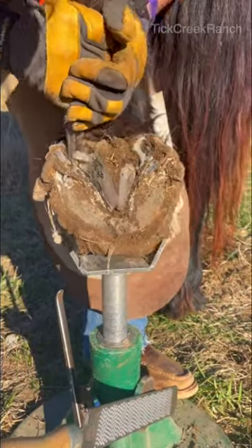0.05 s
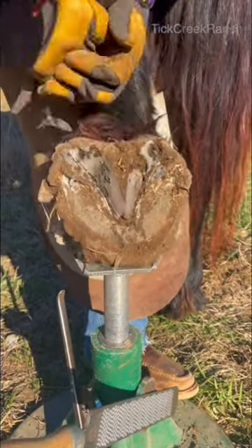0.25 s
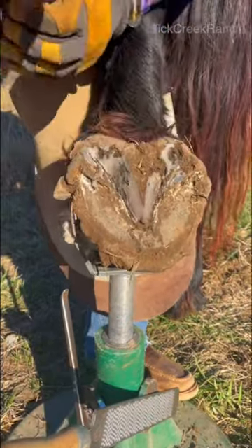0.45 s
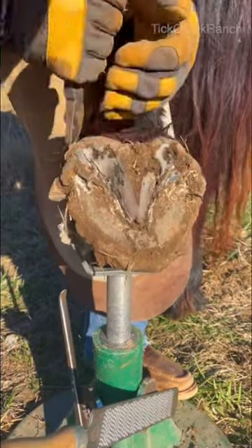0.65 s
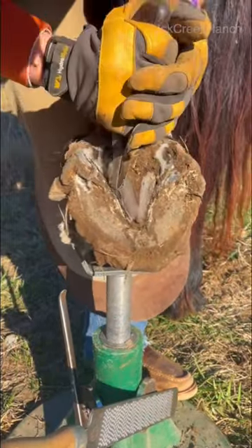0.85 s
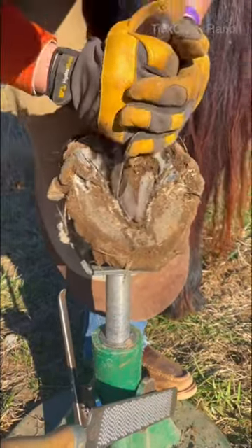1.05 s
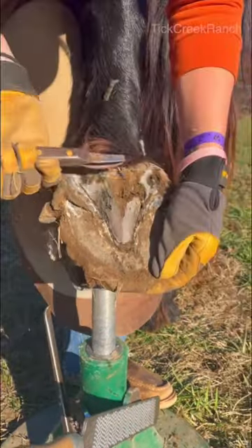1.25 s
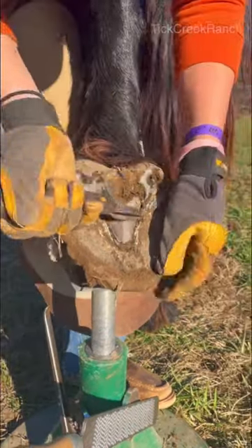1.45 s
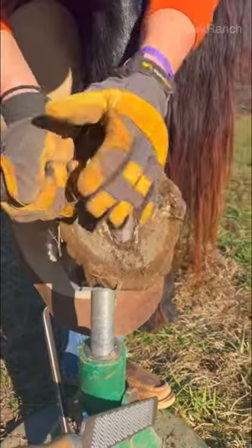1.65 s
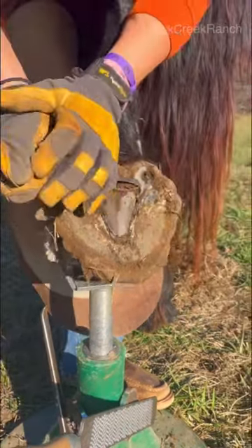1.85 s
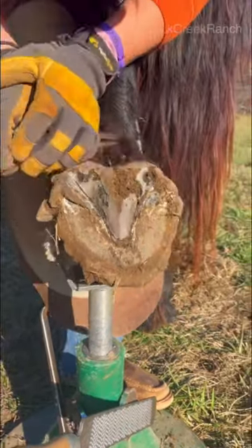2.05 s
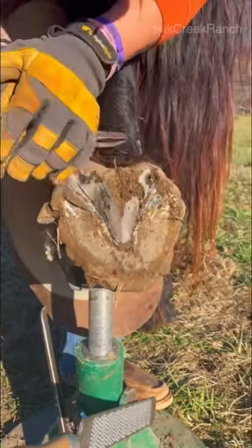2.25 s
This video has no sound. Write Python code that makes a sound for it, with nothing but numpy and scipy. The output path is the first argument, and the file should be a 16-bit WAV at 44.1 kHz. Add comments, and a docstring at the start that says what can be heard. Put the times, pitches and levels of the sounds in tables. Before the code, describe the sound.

Close, dry scraping and clicking of a blade paring a horse hoof outdoors.

```python
"""A dry rasp and a knock over low wind: a hoof knife paring a horse's hoof on a metal stand,
outdoors, close to a two-port microphone. Blade and gloves rub on horn, grit ticks, steel squeaks
and pings faintly. Knocks travel through the stand as falling chirps, and light wind rumbles on the
ports. In front, hard cuts of the stick-slipping edge and sharp snaps and taps ring hoof and blade."""
import sys
import numpy as np
from scipy import signal
from scipy.fft import rfft, irfft, next_fast_len
from scipy.io import wavfile

SR = 44100
rng = np.random.default_rng(int(sys.argv[2]) if len(sys.argv) > 2 else 0)


def transcribe(u):
    """Save the signal u as a 16-bit wav file named by the first command-line argument.

    u: samples, shape (n,) or (channels, n), limited to [-1, 1]; the rate is SR.
    q: integer samples, one column per channel.
    """
    v = np.clip(np.atleast_2d(u).T, -1, 1)
    q = np.round(v * 32767).astype(np.int16)
    wavfile.write(sys.argv[1], SR, q)


N = 101429


def from_db(db):
    """Decibels to gain."""
    return 10 ** (np.asarray(db) / 20)


def unit_rms(x):
    """Scale to an rms of 1."""
    return x / np.sqrt(np.mean(x ** 2) + 1e-20)


def in_time(rows):
    """Columns of a curve table at every sample."""
    times, *columns = np.transpose(rows)
    return [np.interp(np.arange(N) / SR, times, column) for column in columns]


def at_hz(rows, hz):
    """A spectrum table read on a log-frequency axis."""
    row_hz, values = np.transpose(rows)
    return np.interp(np.log(hz + 1e-9), np.log(row_hz), values)


def shaped(x, gain):
    """Filter by a gain given as a function of frequency."""
    size = next_fast_len(N + 4096)
    hz = np.arange(size // 2 + 1) * SR / size
    return irfft(rfft(x, size) * gain(hz), size)[..., :N]


def drift(rate_hz):
    """Smooth random wander; rms 1."""
    r = np.exp(-2 * np.pi * rate_hz / SR)
    return unit_rms(signal.lfilter([1], [1, -2 * r, r * r], rng.standard_normal(N + SR))[SR:])


def grains(per_s, spread_db):
    """Random clicks of uneven size and sign; rms 1."""
    sizes = from_db(spread_db * np.minimum(rng.exponential(1, N), 4))
    signs = rng.choice([-1, 1], N)
    return unit_rms(sizes * signs * (rng.random(N) < per_s / SR))


def ring(clicks, hz, t60):
    """A unit click sets a sine of height 1 ringing."""
    r, w = from_db(-60 / (t60 * SR)), 2 * np.pi * hz / SR
    return signal.lfilter([0, np.sin(w)], [1, -2 * r * np.cos(w), r * r], clicks + 1e-18)


def add(out, start_s, sound):
    """Mix a short sound in at a time."""
    i = int(start_s * SR)
    out[i:i + len(sound)] += sound[:N - i]


# Light wind, right on the microphone. Each row: time in seconds, level in dB.
WIND_LEVEL = [(0, -65), (.03, -52.5), (.1, -63), (.19, -55), (.22, -59.5), (.3, -45), (.37, -65.5),
              (.44, -57), (.56, -63), (.62, -56), (.8, -64.5), (.97, -61.5), (1.0, -53.5), (1.04, -63.5),
              (1.45, -64.5), (1.56, -69.5), (1.82, -64), (2.09, -63), (2.18, -66), (2.3, -65)]
# Its colour. Each row: frequency in Hz, relative level in dB.
WIND_SPECTRUM = [(22, -23), (45, -0.5), (70, 1), (120, -3.5), (200, -13.5), (350, -22), (600, -31.5)]

def wind(correlation=0.89):
    """Wind rumbles on the two ports, mostly alike in both."""
    level_db, = in_time(WIND_LEVEL)
    colour = lambda hz: from_db(at_hz(WIND_SPECTRUM, hz)) * (hz > 15) / (1 + (hz / 600) ** 4)
    mid, side = shaped(rng.standard_normal((2, N)), colour)
    pair = np.sqrt(1 + correlation) * mid + np.sqrt(1 - correlation) * side * [[1], [-1]]
    return from_db(level_db) * unit_rms(pair)


# At the microphone. Each row: frequency in Hz, lead of the left port over the right in radians.
LEFT_PORT_LEAD = [(20, 0), (2200, 0.5643), (4000, 1.5), (6000, 0.5), (7050, 4), (8350, 1), (9500, 7),
                  (12000, 7.5), (13500, 8.5), (15200, 10), (17000, 11.5)]
# Scatter off grass and hands. Each row: frequency in Hz, level in dB relative to the direct sound.
SCATTER_SPECTRUM = [(100, -30), (600, 0.5), (1500, -9.5), (3500, -15.5), (6800, -36.5), (15000, -28.5)]

def ports(work, rubbing):
    """Each port hears it all with its own phase, plus its own scatter of the rubbing."""
    pair = []
    for side in (1, -1):
        direct = shaped(work + rubbing, lambda hz: np.exp(.5j * side * at_hz(LEFT_PORT_LEAD, hz)))
        scatter = shaped(rubbing * drift(410), lambda hz: from_db(at_hz(SCATTER_SPECTRUM, hz)))
        pair.append(direct + scatter)
    return np.array(pair)


def wavering_tones(rows, hz, length_s):
    """Short tones that swell and fade, unsteady in pitch and level."""
    swells, t = np.zeros(N), np.arange(int(length_s * SR)) / SR
    pitch_hz = hz + 48.25 * drift(240)
    tone = np.sin(2 * np.pi * np.cumsum(pitch_hz) / SR)
    for start, db in rows:
        add(swells, start, from_db(db) * np.sin(np.pi * t / length_s))
    return swells * tone * from_db(2.5 * drift(200))


# The blade, faint even this close. Each row: start in seconds, level in dB.
BLADE_SQUEAKS = [(1.538, -72), (1.556, -69.5), (1.616, -73), (1.674, -64.5)]
STEEL_PINGS = [(.317, -53.5), (.553, -62)]
BLADE_RELEASE = [(2.042, -52.5)]

def blade():
    """The steel squeaks as it slides, pings, and sings as it comes free."""
    squeaks = wavering_tones(BLADE_SQUEAKS, hz=1930, length_s=0.016)
    pings = wavering_tones(STEEL_PINGS, hz=10600, length_s=0.013)
    release = wavering_tones(BLADE_RELEASE, hz=5000, length_s=0.034)
    return squeaks + pings + release


# Rubbing on the horn, close up. Each row: time in seconds, level of the middle band in dB,
# then lows and treble in dB relative to it.
RASP_LEVELS = [(0, -56.5, 3, -0.5), (.025, -56, -4, -2), (.05, -62, -10, -7), (.13, -71.5, -24, -5),
               (.165, -53, -3, -4), (.21, -59.5, -10.5, -8), (.22, -45.5, -8, -2), (.243, -41.5, -2.5, 0),
               (.258, -57, -21, -7.5), (.28, -54, 3.5, -5), (.32, -63.5, -10, 0.5), (.36, -71.5, -8, -3.5),
               (.5, -76, 5, -4.5), (.75, -78.5, 5.5, -3.5), (.762, -62.5, -11, 5.5), (.785, -63.5, -2, -11),
               (.82, -70, 4, -6), (.98, -79, 7, -2), (1.1, -73, -19.5, -4), (1.17, -64, 0, -1),
               (1.24, -71, 2.5, -7.5), (1.255, -61, -13, -9), (1.32, -64, -12, -7.5), (1.39, -81, 4, -0.5),
               (1.46, -72.5, -7, -4), (1.5, -83, -5, -2), (1.66, -73, -6, -5), (1.72, -64, -9, -9),
               (1.76, -66, -7.5, -7), (1.87, -69, -8.5, -8), (1.96, -59, -2, -4.5), (2.0, -63, 0, 0),
               (2.02, -57, -10, 2.5), (2.052, -48, -7, -7.5), (2.07, -56, -3, -9), (2.13, -61.5, -8, -4.5),
               (2.19, -72.5, -19, -8), (2.24, -62, -8.5, -8), (2.3, -60, -4, -9)]
# Colour within the bands. Each row: frequency in Hz, relative level in dB.
RASP_SPECTRUM = [(200, 13), (400, 6), (1400, -1), (2100, -2.5), (3200, -5.5), (5000, -6), (7500, -4.5),
                 (10000, -4.5), (13000, -8), (16000, -15)]

def rasp(lows_below_hz=1000, treble_above_hz=6500, flicker_db=1.5, flicker_hz=46):
    """Dense grit under blade and gloves; three bands swell, each with its own level and grains."""
    level_db, lows_db, treble_db = in_time(RASP_LEVELS)
    colour = lambda hz: from_db(at_hz(RASP_SPECTRUM, hz)) * hz ** 2 / (hz ** 2 + 200 ** 2)
    lows = lambda hz: 1 / (1 + (hz / lows_below_hz) ** 6)
    treble = lambda hz: 1 - 1 / (1 + (hz / treble_above_hz) ** 10)
    middle = lambda hz: 1 - lows(hz) - treble(hz)
    bands = [shaped(grains(per_s=9000, spread_db=1.5), lambda hz: colour(hz) * passband(hz))
             for passband in (lows, middle, treble)]
    grit = sum(unit_rms(band) * from_db(db + flicker_db / 2 * drift(flicker_hz))
               for band, db in zip(bands, (lows_db, 0, treble_db)))
    return from_db(level_db + flicker_db * drift(flicker_hz)) * grit


# Short bright ticks: grit, and the sharp cracks that open two knocks.
# Each row: start in seconds, level in dB.
BRIGHT_TICKS = [(0.146, -47), (.62, -61), (0.808, -49.5), (.8371, -45), (0.887, -40), (1.141, -53),
                (1.459, -56), (1.965, -38)]

def ticks(t60=0.013, above_hz=1180):
    """Each tick is a short, bright burst of noise."""
    bursts, t = np.zeros(N), np.arange(SR // 20) / SR
    for start, db in BRIGHT_TICKS:
        add(bursts, start, rng.standard_normal(len(t)) * from_db(db - 60 * t / t60))
    return signal.sosfilt(signal.butter(2, above_hz, "high", fs=SR, output="sos"), bursts)


# The metal stand under the hoof. Each row: frequency in Hz, width in Hz, gain in dB.
STAND_MODES = [(235, 99, -3.5), (567, 176, 5), (1530, 1200, 2)]

def stand(waves, direct_db=-8):
    """Broad resonances of the stand, over a little direct sound."""
    out = from_db(direct_db) * waves
    for k, (hz, width_hz, db) in enumerate(STAND_MODES):
        r = np.exp(-np.pi * width_hz / SR)
        gain = (1 - r * r) / 2
        feedback = [1, -2 * r * np.cos(2 * np.pi * hz / SR), r * r]
        out += (-1) ** k * from_db(db) * signal.lfilter([gain, 0, -gain], feedback, waves)
    return out


# Knocks, heard through the stand. Each row: start in seconds, level into the stand in dB,
# sweep in cycles per e-fold of time, seconds to fade by 60 dB, opening pitch in Hz.
STAND_KNOCKS = [(0.123, -31.5, 1.45, 0.17, 244), (0.247, -29.5, 1.68, 0.05, 730),
                (0.2663, -30.5, 2.69, 0.032, 1940), (0.2728, -34.5, 1.65, 0.042, 920),
                (0.401, -32, 1.3, 0.17, 188), (.487, -37, 2.8, 0.049, 940), (0.581, -37, 3, 0.025, 457),
                (0.791, -43, 1.8, 0.022, 1000), (0.8369, -28, 4.6, 0.0064, 2540),
                (.8378, -28.5, 1.9, .05, 1150), (0.8911, -35.5, 1.38, 0.071, 423),
                (.992, -42.5, 0.63, 0.096, 295), (2.0532, -30, 1.9, 0.014, 1150)]

def knocks():
    """Bending waves arrive highs first: a chirp falling as one over time."""
    waves, t = np.zeros(N), np.arange(SR // 5) / SR
    for start, db, sweep, t60, top_hz in STAND_KNOCKS:
        travel_s = sweep / top_hz
        chirp = np.sin(2 * np.pi * sweep * np.log(1 + t / travel_s))
        attack = 1 - np.exp(-t / travel_s)
        add(waves, start, chirp * attack * from_db(db - 60 * t / t60))
    return stand(waves + 1e-18)


# Hoof and blade together. Each row: frequency in Hz, gain in dB, seconds to fade by 60 dB.
HOOF_MODES = [(843, 1.5, 0.026), (1330, 4.5, 0.013), (1927, 2, 0.019), (2236, 0.5, 0.016),
              (2720, -6.5, 0.01), (3296, -2.5, .008), (3638, 1.5, 0.013), (5400, -4, 0.012),
              (6390, 1.5, 0.0069), (9830, 3.5, 0.0099)]
# The edge biting into horn, close to the microphone, one list a cut.
# Each row: time in seconds, push in dB, pitch that rings most in Hz.
HARD_CUTS = [
    [(.214, -66, 2400), (.22, -39, 2410), (.234, -36, 2000), (.237, -28, 2160), (.246, -28, 2500),
     (.258, -78, 2200)],
    [(1.14, -68, 2000), (1.17, -56.5, 1900), (1.22, -75, 2000)],
    [(1.69, -72, 2500), (1.735, -57, 3200), (1.77, -78, 2500)],
    [(1.96, -71, 2200), (1.964, -44, 2000), (1.973, -56, 1200)],
    [(2.009, -73, 1700), (2.013, -50, 1710), (2.018, -58, 1600), (2.021, -40, 1350), (2.034, -41, 1500),
     (2.037, -58, 2100), (2.042, -34.5, 1900), (2.056, -53.5, 1410), (2.1, -58, 1310)],
]
# Single sharp snaps and taps. Each row: time in seconds, force in dB, pitch that rings most in Hz.
SNAPS_AND_TAPS = [(.2215, -35, 2620), (0.236, -32, 1940), (0.2403, -27, 3600), (.2427, -21, 2600),
                  (0.246, -29, 3500), (0.8878, -40.5, 940), (1.9628, -43.5, 2160), (2.0118, -40, 1676),
                  (2.019, -38.5, 1405), (2.0485, -36.5, 1287), (2.0529, -39.5, 2215)]

def cuts(snap_spread_db=2):
    """Stick-slip clicks under the biting edge, and single snaps and taps, ring hoof and blade."""
    t = np.arange(N) / SR
    push, focus_hz = np.zeros(N), np.ones(N)
    for cut in HARD_CUTS:
        times, push_db, pitch_hz = np.transpose(cut)
        push += from_db(np.interp(t, times, push_db, left=-120, right=-120))
        focus_hz += np.interp(t, times, pitch_hz, left=0, right=0)
    slips = grains(per_s=3400, spread_db=4.5)
    ring_rms = np.std(sum(from_db(db) * ring(slips, hz, t60) for hz, db, t60 in HOOF_MODES))
    snap_s, snap_db, snap_hz = np.transpose(SNAPS_AND_TAPS)
    out = np.zeros(N)
    for k, (hz, db, t60) in enumerate(HOOF_MODES):
        # A mode is driven less the further it lies from the pitch: 14 dB less from an octave away.
        off_pitch_db = lambda pitch: -14 * np.minimum(np.abs(np.log2(hz / pitch)), 1)
        force = from_db(off_pitch_db(focus_hz)) * slips * push / ring_rms
        strike_db = snap_db + off_pitch_db(snap_hz) + rng.normal(0, snap_spread_db, len(snap_s))
        force[(snap_s * SR).astype(int)] += from_db(strike_db)
        out += (-1) ** k * from_db(db) * ring(force, hz, t60)
    return out


def scene():
    """Work at the hoof, close to the two ports, with wind on them."""
    work = blade() + cuts() + knocks() + ticks()
    return ports(work, rasp()) + wind()


def record(dry):
    """A steep low-pass takes off the very top, 70 dB down from 16.4 kHz."""
    return signal.sosfilt(signal.cheby2(12, 70, 16400, fs=SR, output="sos"), dry)


dry = scene()
out = record(dry)
transcribe(out)
```